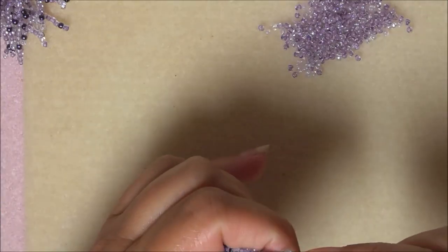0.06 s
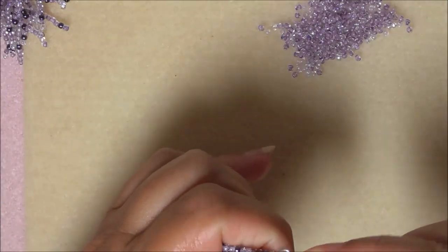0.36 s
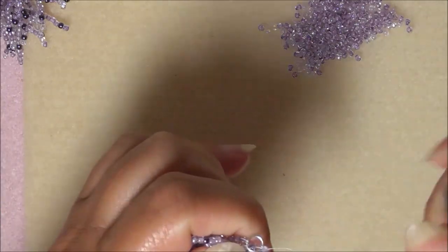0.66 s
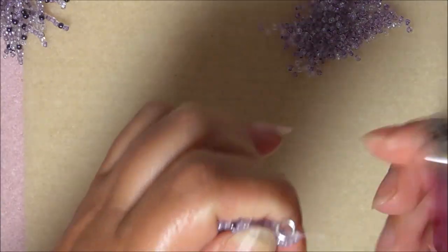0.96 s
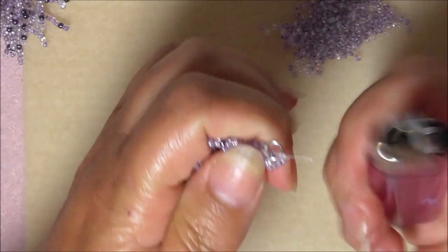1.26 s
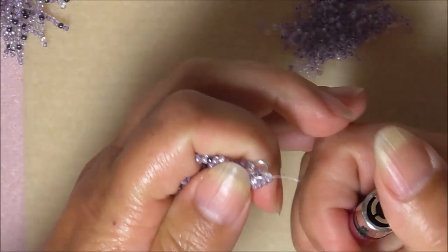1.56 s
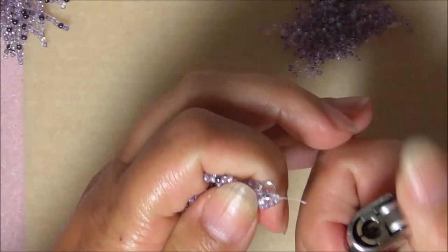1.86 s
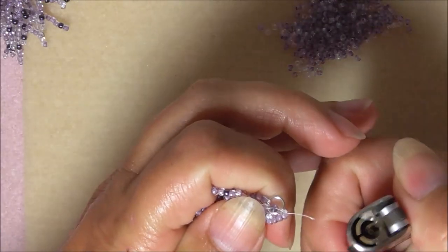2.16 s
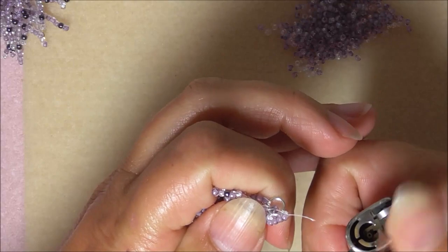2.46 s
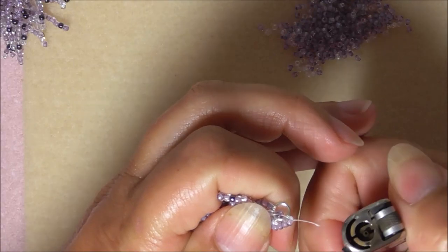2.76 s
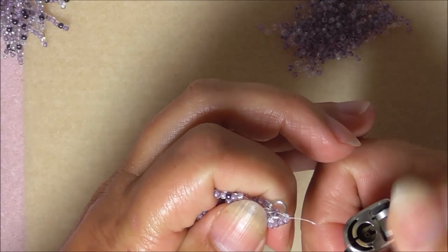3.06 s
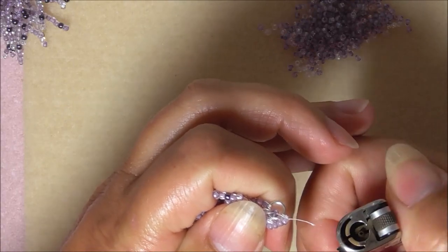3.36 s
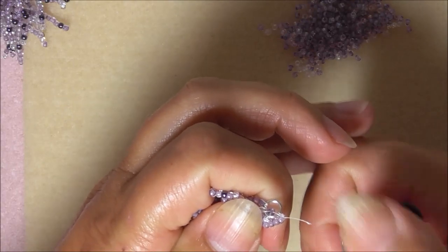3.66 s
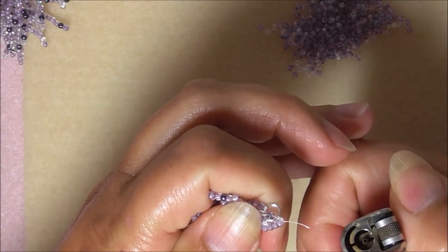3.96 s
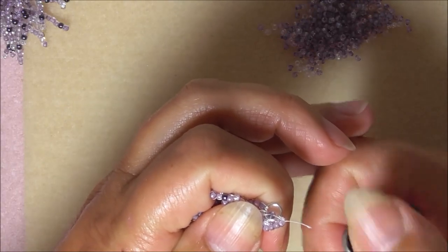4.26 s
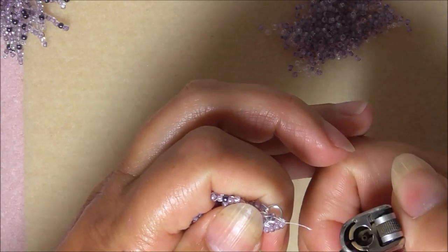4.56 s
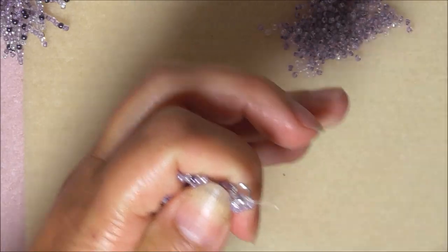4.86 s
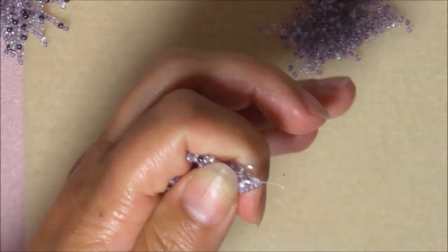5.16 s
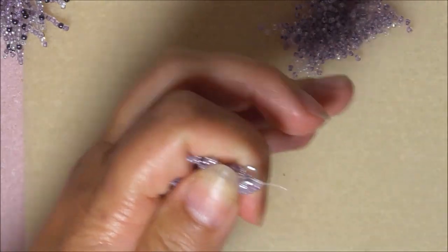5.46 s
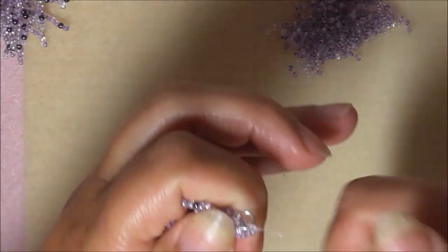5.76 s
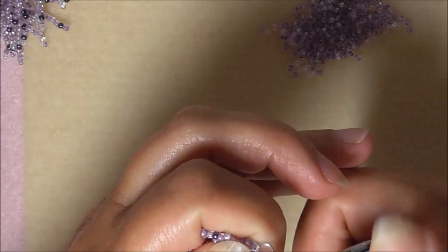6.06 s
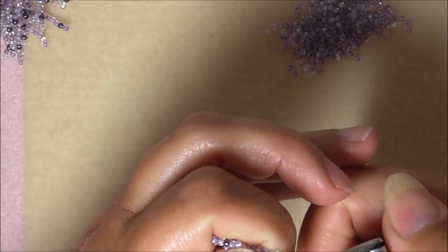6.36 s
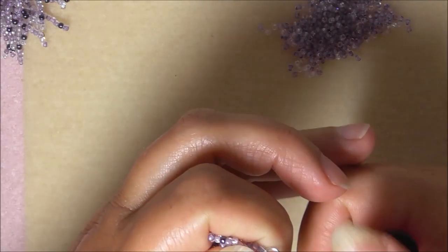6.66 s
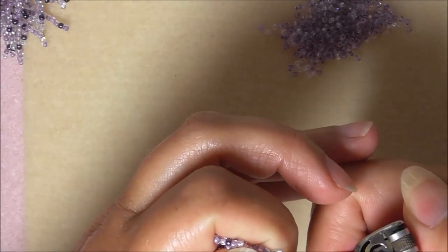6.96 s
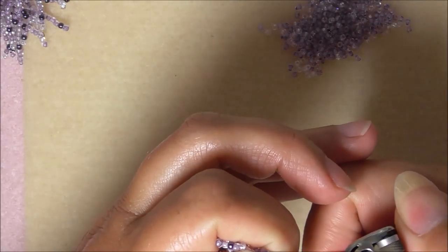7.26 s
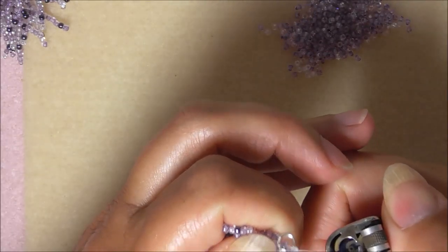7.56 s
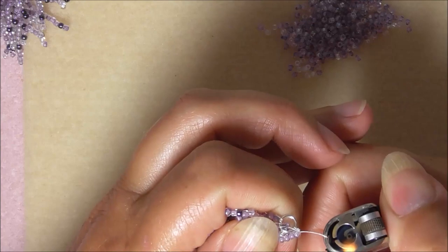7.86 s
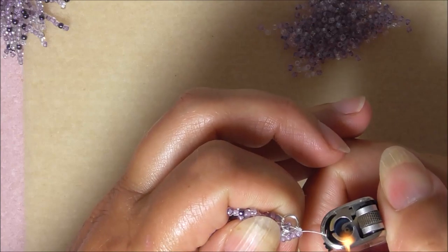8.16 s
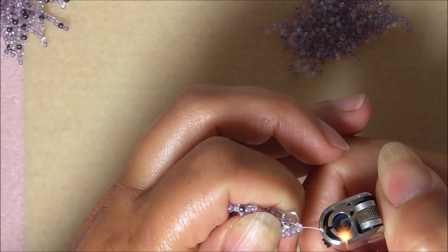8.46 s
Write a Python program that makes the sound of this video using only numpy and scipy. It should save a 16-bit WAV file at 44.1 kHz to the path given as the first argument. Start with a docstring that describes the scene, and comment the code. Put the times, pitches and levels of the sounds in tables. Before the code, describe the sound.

A small quiet room with a low hum and soft hiss is heard throughout. A camera's focus motor purrs faintly at the start and returns in brief spells. From about 1.0 to 1.4 seconds a lighter is picked up close to the microphone, its loose parts ticking and rattling. Its flint wheel is then struck six times, at about 1.8, 2.2, 2.8, 3.3, 3.9 and 4.5 seconds. Each strike is a very short steel rasp ending in a bright, sharp crack, with a soft low thump as the thumb hits the gas lever. The lever shuts with small clicks at 3.7 and 4.9 seconds. Light ticks and soft taps on the desk follow between 5.2 and 6 seconds. Three more strikes come at 5.9, 6.3 and 6.9 seconds. After one tiny tick near 7.4 seconds, only the faint background remains until nearly 9 seconds.

```python
"""Striking a flint lighter

A lighter is picked up, struck nine times over a desk in a small quiet room, and put down, its loose
parts ticking. In each stroke stick-slip friction excites the steel head until the flint sparks with a
crack, and the thumb's impact on the gas lever sets desk and room booming. The stepping focus motor of
a nearby camera purrs faintly over the room's hum and hiss."""
import sys
import numpy as np
from scipy import signal
from scipy.fft import rfft, irfft
from scipy.io import wavfile
from scipy.ndimage import uniform_filter1d

SR = 44100
rng = np.random.default_rng(int(sys.argv[2]) if len(sys.argv) > 2 else 0)


def persist_wave(psi):
    """Save psi, clipped to +-1, as 16-bit WAV."""
    counts = np.round(np.clip(psi, -1, 1) * 32767).astype(np.int16)
    wavfile.write(sys.argv[1], SR, np.atleast_2d(counts).T)


N = 379648

# Levels are relative: each source applies its own gain.
# spectral densities of room air and microphone hiss: f/Hz, level/dB
AIR_SPECTRUM = [(15, -39.5), (25, -11.5), (54, -4.5), (75, -16.5), (119, -3), (485, -10), (629, -11.5),
                (832, -10.5), (1120, -14.5), (1520, -18), (1820, -26), (2310, -20), (3000, -36.5),
                (3900, -66), (6600, -120)]
HISS_SPECTRUM = [(1500, -20), (3000, -1.5), (4300, 1), (5900, -4.5), (6600, -1.5), (7500, 3.5), (8600, 2.5),
                 (11200, 3), (14000, 1.5), (15500, -10)]
AIR_RESONANCES = [(48, 12, 4), (848, 71, 6.5), (1560, 130, 9.5)]  # peaks in the air noise: f/Hz, width/Hz, level/dB
AIR_COHERENCE = [(50, .8), (180, 0.29), (550, -0.22), (1650, .15), (3000, .15)]  # likeness of the air noise left and right: f/Hz, correlation
# swells of rumble and hum: start t/s, end t/s, level/dB above rest
RUMBLE_SWELLS = [(1.0, 2.55, 7), (4.4, 6.2, 8.5)]
HUM_SWELLS = [(4.55, 5.36, 14), (7.56, 8.04, 15)]
FOCUS_RUNS = [(.007, .68, -58.5), (1.129, 1.28, -59.5), (2.49, 2.52, -57.5), (3.407, 3.46, -59.5),
              (3.729, 3.8, -59), (5.362, 5.5, -63.5), (5.604, 5.659, -60), (5.741, 6.06, -62.5),
              (7.646, 7.82, -59.5)]  # the motor turns: start t/s, end t/s, level/dB
# modes of lens barrel, metal hood, desk with room, and gas lever: f/Hz, level/dB, T60/s
LENS_MODES = [(1363, -6.5, 0.051), (1575, -1, .04), (2133, -8, 0.047), (2374, -1, 0.029),
              (3240, -11.5, 0.015), (4780, -3, 0.011)]
HOOD_MODES = [(7520, -8, 0.18), (5460, -24.5, 0.099782), (3706, -26.5, .08)]
BOOM_MODES = [(104.33, -58.5, 0.35), (137.4, -50.5, 0.21), (166, -53, .15), (190.6, -51.5, .35),
              (248, -60, 0.17)]
LEVER_MODES = [(3165, -4, .04), (5420, -1.5, .05), (7540, -4, .15)]
# knocks in the hand: t/s, level/dB, hood level/dB relative to the knock, rattle decay/s
HANDLING_KNOCKS = [(0.9515, -56, 7, .0023), (.977, -53, -6, 0.0045), (1.066, -48, -6, 0.0018),
                   (1.093, -47.5, -14, 0.003748), (1.119, -53.5, -3, .0024), (1.299, -51.5, -10, 0.0079),
                   (1.3163, -39.5, -9, 0.0057), (1.3801, -34.5, -19.5, 0.0036), (1.397, -45, -19, 0.0019),
                   (1.408, -52, 0, 0.005185), (5.163, -56, -24.5, .0015), (5.2529, -44, -30, .0015),
                   (5.264, -48.5, -25, 0.0032), (5.301, -58.5, -30, 0.004), (5.413, -55.5, -18.5, 0.0022),
                   (5.5066, -46, -28, 0.0025), (5.5641, -39.5, -1, 0.0021), (7.362, -56.5, -29, 0.0009047)]
# responses of the steel head (wheel, flint, hood) and the plastic body: f/Hz, level/dB
HEAD_SPECTRUM = [(60, -23.5), (200, -15.5), (700, -23), (1100, -19), (1800, -23), (2800, -22), (3600, -9.5),
                 (4600, -11), (5300, -14), (6100, -12), (7200, -5), (10000, -6), (12500, -5), (15500, -15)]
BODY_SPECTRUM = [(40, -23), (120, 3.5), (280, 1.5), (420, -4.5), (560, -1.5), (750, -11.5), (1050, -3.5),
                 (1500, -16.5), (3000, -17), (8000, -35)]
# head resonances with parts loose, wheel dragging, wheel free, lever shutting: f/Hz, width/Hz, level/dB
LOOSE_PEAKS = [(3150, 250, 5), (4040, 280, 4), (5450, 230, 8), (7600, 350, 4), (8923, 600, 5.5)]
DRAG_PEAKS = [(4490, 210, 7.5), (5283.7, 700, -2.5), (7370, 450, 5), (10100, 400, 1), (11300, 700, 3.5)]
FREE_PEAKS = [(3688.4, 300, 1), (4260, 110, 2), (8030, 640, 7), (8540, 1500, 2.5), (11200, 800, 7.5)]
SNAP_PEAKS = [(8200, 1300, 12), (3500, 500, 2)]
# strokes of the wheel: spark t/s, duration/s, early rasp level/dB, late rasp level/dB, spark level/dB,
# treble tilt/(dB/octave), lead of the wheel's catch over the spark/s, catch level/dB
STROKES = [(1.7787, 0.044, -55, -31, -28.5, .9, 0.04243, -64),
           (2.1848, .053, -54, -32.5, -22, 1, 0.059, -50),
           (2.7634, 0.058, -55, -30.5, -23, -0.5, 0.11, -52.5),
           (3.3318, .045, -54.5, -31.5, -22.5, -0.5, .0719, -53),
           (3.89, .059, -53, -29, -23.5, -0.4, .0722, -48),
           (4.4827, 0.06458, -59.5, -29.5, -26, -0.5, 0.09, -48),
           (5.9154, .045, -55, -32, -29, 1.5, 0.037, -60.5),
           (6.3462, .064, -59.5, -32.5, -26, -0.5, .0759, -62),
           (6.8787, 0.056, -57, -30.5, -22.5, 0, 0.088, -52)]
# the thumb lands on the lever: t/s, knock level/dB, thump level/dB, knock tilt/(dB/octave)
THUMB_LANDINGS = [(1.777, -9.5, -9.5, 0), (1.805, -4, -6, -2.5), (2.1838, 0, -2.5, 0),
                  (2.7647, -1, 0.5, -0.5), (3.3321, -2, -4, -0.5), (3.8899, -1.5, 0, .5),
                  (4.484, -2, 1, -1.5), (5.915, -8.5, -3, 0), (6.3471, -4.5, -2, -1.5),
                  (6.8779, 0.5, -3, 0)]
LEVER_SNAPS = [(3.6918, -42.5), (4.8795, -42)]  # the gas lever shuts: t/s, level/dB
DESK_TAPS = [(4.859, -59, 847), (5.19, -51.5, 1040), (5.367, -59, 1000), (5.931, -54.5, 520),
             (5.988, -57.5, 470)]  # fingers and lighter touch the desk: t/s, level/dB, f/Hz
REVERB_TIMES = [(100, 0.2), (500, 0.1), (2000, .3), (5000, .33), (9000, 0.27), (15000, 0.2)]  # decay of the room: f/Hz, T60/s
NEAR_ECHOES = [(.0012, 0.25), (.0027, .16), (.0046, 0.12), (.0078, .09), (.0097, .09), (.0125, .06),
               (.017, .045)]  # reflections from hands and desk: delay/s, gain
STEREO_LEVEL = [(100, 2), (600, -3), (1500, 0), (4500, -0.5), (7800, 1.5), (9100, 5), (10500, 0),
                (12300, -4.5), (15000, -3.5)]  # excess of left over right: f/Hz, level/dB
STEREO_PHASE = [(0, 0), (3620, 0.1), (4220, 0.29), (7670, 0.1), (8180, 0.5), (8530, -0.1), (11200, -0.044),
                (14100, 0.36), (16100, 0.1)]  # lead of left over right: f/Hz, phase/rad

BODY_HZ, SCENE_HZ = np.fft.rfftfreq(2048, 1 / SR), np.fft.rfftfreq(N, 1 / SR)


def gain_of(db):
    """Amplitude ratio of a level in decibels."""
    return 10 ** (np.asarray(db) / 20)


def unit_rms(x):
    """Normalisation to unit mean power."""
    return x / np.sqrt(np.mean(x ** 2) + 1e-20)


def curve(points, hz):
    """Linear interpolation on a logarithmic frequency axis."""
    f, value = np.transpose(points)
    return np.interp(np.log(hz + 1), np.log(f + 1), value)


def resonances(peaks, hz):
    """Resonance peaks as Lorentzian humps in decibels."""
    return sum(db / (1 + (2 * (hz - f) / width) ** 2) for f, width, db in peaks)


def add(mix, s, sound):
    """Superposition of a sound on the mix at time s."""
    part = mix[..., max(round(s * SR), 0):][..., :sound.shape[-1]]
    part += sound[..., :part.shape[-1]]


def butterworth(x, hz, kind, order=2):
    """Maximally flat high-pass or low-pass filtering."""
    return signal.sosfilt(signal.butter(order, hz, kind, fs=SR, output="sos"), x)


def impulse_response(db):
    """Minimum-phase response of unit energy, found by folding the cepstrum of a spectrum."""
    cepstrum = irfft(np.log(gain_of(db)))
    half = len(db) - 1
    cepstrum[1:half] *= 2
    cepstrum[half + 1:] = 0
    response = irfft(np.exp(rfft(cepstrum)))
    return response / np.linalg.norm(response)


def ring(modes, t):
    """Free vibration as a sum of exponentially damped modes."""
    return sum(gain_of(db - 60 * t / t60) * np.sin(2 * np.pi * hz * t) for hz, db, t60 in modes)


def swells(spans, rest_db, fade_s):
    """Slow amplitude modulation: the level ramps up from rest for each span."""
    t = np.arange(N) / SR
    rise_db = sum(db * np.clip(.5 + np.minimum(t - start, end - t) / fade_s, 0, 1)
                  for start, end, db in spans)
    return gain_of(rest_db + rise_db)


def stereo_noise(db, coherence):
    """Partial coherence: two channels share a part of their coloured noise."""
    left, independent = rfft(rng.standard_normal((2, N)))
    right = coherence * left + np.sqrt(1 - coherence ** 2) * independent
    return unit_rms(irfft(np.array([left, right]) * gain_of(db), N))


def background(air_db=-68, hiss_db=-76, hum_hz=124, waver_hz=3):
    """Noise floor: stationary air and hiss, a swelling rumble and a frequency-modulated hum."""
    air_colour = curve(AIR_SPECTRUM, SCENE_HZ) + resonances(AIR_RESONANCES, SCENE_HZ)
    air = stereo_noise(air_colour, curve(AIR_COHERENCE, SCENE_HZ)) * gain_of(air_db)
    hiss = stereo_noise(curve(HISS_SPECTRUM, SCENE_HZ), coherence=.35) * gain_of(hiss_db)
    low_colour = curve([(50, -26), (115, -4), (220, -1), (400, -14), (1200, -20), (3000, -58.5)], SCENE_HZ)
    rumble = stereo_noise(low_colour, coherence=.33) * swells(RUMBLE_SWELLS, rest_db=-77.5, fade_s=.3)
    drift = unit_rms(uniform_filter1d(rng.standard_normal(N), size=3000))
    hum = np.sqrt(2) * np.sin(2 * np.pi * np.cumsum(hum_hz + waver_hz * drift) / SR)
    return air + hiss + rumble + hum * swells(HUM_SWELLS, rest_db=-84, fade_s=.1)


def focus_motor(level_db=-1.5, step_hz=50, top_hz=4500):
    """Periodic impacts: each motor step rings the lens barrel, every second one more weakly."""
    out, t = np.zeros(N), np.arange(SR // 20) / SR
    attack = 1 - np.exp(-t / .0012)
    for start, end, db in FOCUS_RUNS:
        for k, s in enumerate(np.arange(start, end, 1 / step_hz)):
            modes = [(hz * (1 + .016 * rng.standard_normal()), level, t60) for hz, level, t60 in LENS_MODES]
            whirr = .87 * rng.standard_normal(len(t)) * np.exp(-t / .0081)
            add(out, s, gain_of(db + level_db - 1.3 * (k % 2)) * (ring(modes, t) + whirr) * attack)
    return butterworth(out, top_hz, "low")


def friction(t, teeth_hz, rough_db, rays=1):
    """Stick-slip noise, modulated as teeth catch and slip; one row per direction of radiation."""
    teeth_passed = np.cumsum(teeth_hz * np.ones(len(t))) / SR
    bite = rng.standard_normal(len(t))
    bite_db = rough_db * np.interp(teeth_passed, np.arange(len(t)), bite)
    return unit_rms(rng.standard_normal((rays, len(t))) * gain_of(bite_db))


def steel_head(peaks, tilt_db, detune=.012, ripple_db=2.5):
    """A loaded resonator: each grip shifts the main resonances and damps the small ones differently."""
    shift = 1 + detune * rng.standard_normal()
    octaves = np.clip(np.log2((BODY_HZ + 1) / 9000), -2, 1)
    ripple = uniform_filter1d(rng.standard_normal(len(BODY_HZ)), size=7)
    ripple = unit_rms(uniform_filter1d(ripple, size=5))
    colour = curve(HEAD_SPECTRUM, BODY_HZ) + resonances(peaks, BODY_HZ * shift)
    return impulse_response(colour + tilt_db * octaves + ripple_db * ripple)


def room(sound, wet_db, mids_db, stray=.3):
    """Multipath propagation: direct sound, echoes that shift as the hands move, and a diffuse tail."""
    rays, size = np.atleast_2d(sound), SR // 3
    t = np.arange(size) / SR
    diffuse = rng.standard_normal((len(rays), 2, size)) * np.clip((t - .003) / .0063, 0, 1)
    hz, age, spectra = signal.stft(diffuse, SR, nperseg=256)
    early = 1 + 1.5 * np.exp(-age / .013)  # the nearest walls answer first
    colour_db = mids_db * np.exp(-age / .059) / (1 + (hz[:, None] / 6000) ** 4)
    decay_db = 60 * age / curve(REVERB_TIMES, hz)[:, None]
    tail = signal.istft(spectra * early * gain_of(colour_db - decay_db), SR, nperseg=256)[1][..., :size]
    response = gain_of(wet_db) * tail / np.linalg.norm(tail[:, 0])
    response[0, :, 0] += 1  # the first ray meets both microphones alike
    response[1:, :, 0] += [stray, -stray]  # the others arrive in antiphase
    for side in response[-1]:
        for delay, gain in NEAR_ECHOES:
            add(side, delay * (1 + .15 * rng.uniform(-1, 1)), np.array([gain]))
    return signal.fftconvolve(rays[:, None], response, axes=2).sum(axis=0)


def regrip_times(quick_s=1, lead_s=.204):
    """Times at which the thumb returns to the wheel between strokes in quick succession."""
    sparks = np.array([row[0] for row in STROKES])
    return sparks[1:][np.diff(sparks) < quick_s] - lead_s


def contacts(hood_db=-15, slide=.59, jiggle_hz=18):
    """Contacts due to backlash: t/s, level/dB, hood level/dB, decay/s, rise over decay, resonances."""
    rows = [(*knock, slide, LOOSE_PEAKS) for knock in HANDLING_KNOCKS]
    rows += [(s, db, hood_db, .0022, .12, SNAP_PEAKS) for s, db in LEVER_SNAPS]
    for s, stroke, early_db, *_, lead, catch_db in STROKES:
        rows.append((s - lead, catch_db, hood_db, .0021, slide, LOOSE_PEAKS))  # the wheel catches
        rows.append((s - stroke, early_db + 1.5, hood_db, .002, slide, DRAG_PEAKS))  # and breaks loose
    rows += [(s, -66.5, hood_db, .015, slide, LOOSE_PEAKS) for s in regrip_times()]
    for s in np.arange(.99, 1.38, 1 / jiggle_hz):  # parts jiggle as the lighter is picked up
        delay, db = rng.random() / jiggle_hz, rng.normal(-62, 2)
        rows.append((s + delay, db, -5, .003, slide, LOOSE_PEAKS))
    return rows


def ticks(rattle_db=2, thin_hz=2100, top_hz=14500):
    """Contact noise: wheel and lever slide and rattle in their play, exciting the hood's modes."""
    out, t = np.zeros((2, N)), np.arange(-SR // 30, SR // 5) / SR
    for s, db, hood_db, decay, slide, peaks in contacts():
        envelope = np.exp(-abs(t) / np.where(t < 0, slide * decay, decay))
        force = friction(t, teeth_hz=1200, rough_db=3)[0] * envelope
        head = steel_head(peaks, tilt_db=-2.5 + .3 * (db + 40), detune=.022)  # softer is duller
        rattle = gain_of(rattle_db) * signal.fftconvolve(force, head)[:len(t)]
        hood = gain_of(hood_db) * ring(HOOD_MODES, np.maximum(t, 0))
        add(out, s + t[0], gain_of(db) * room(rattle + hood, wet_db=-7.5, mids_db=2))
    thin = butterworth(out, thin_hz, "high", order=1)  # small parts radiate little bass
    return butterworth(thin, top_hz, "low", order=1)


def wheel_strokes(rasp_db=-1, spark_db=5, rise_s=.0014, fall_s=.0018):
    """Friction and brittle fracture: the wheel speeds up and bites harder until flint cracks away."""
    out = np.zeros((2, N))
    for s, stroke, early_db, late_db, crest_db, tilt_db, *_ in STROKES:
        t = np.arange(-stroke - .04, .012, 1 / SR)
        creep = [(t[0], early_db - 24), (-stroke, early_db - 14)]
        drive = [(-stroke + .002, early_db - 4.5), (-.029, (early_db + late_db) / 2 - 3), (-.007, late_db)]
        release = [(0, late_db), (.004, late_db - 13.5), (.012, late_db - 38.5)]
        drag_db = np.interp(t, *np.transpose(creep + drive + release))
        teeth_hz = np.interp(t, [-stroke, 0], [350, 1200])
        drag = friction(t, teeth_hz, rough_db=3.5, rays=3) * gain_of(drag_db + rasp_db)
        burst = gain_of(crest_db + spark_db) * np.exp(-abs(t) / np.where(t < 0, rise_s, fall_s))
        fracture = friction(t, teeth_hz=2500, rough_db=.93, rays=3) * burst
        rasp = signal.fftconvolve(drag, steel_head(DRAG_PEAKS, tilt_db)[None])
        crack = signal.fftconvolve(fracture, steel_head(FREE_PEAKS, tilt_db)[None])
        add(out, s + t[0], room(rasp + crack, wet_db=-9, mids_db=13, stray=.2))
    return out


def thumb_landings(knock_db=-18, thump_db=1, swell_s=.004, contact_s=.002, scuff=.06):
    """Impact excitation: the thumb knocks and scuffs the plastic lever, jolting desk and room modes."""
    out, t = np.zeros((2, N)), np.arange(SR // 2) / SR
    octaves, brief = np.log2(BODY_HZ + 20), t[:1024]
    for s, hit_db, low_db, tilt_db in THUMB_LANDINGS:
        body = impulse_response(curve(BODY_SPECTRUM, BODY_HZ) + tilt_db * octaves)
        force = scuff * friction(brief, teeth_hz=1000, rough_db=-.35, rays=3) * np.exp(-brief / contact_s)
        force[0, 0] += 1  # the blow itself
        knock = signal.fftconvolve(force, body[None])
        add(out, s, gain_of(hit_db + knock_db) * room(knock, wet_db=0, mids_db=2, stray=.8))
        modes = [(hz, db + rng.standard_normal(), t60) for hz, db, t60 in BOOM_MODES]
        add(out, s, gain_of(low_db + thump_db) * ring(modes, t) * (1 - np.exp(-t / swell_s)))
    return butterworth(out, 65, "high")


def lever_pings(level_db=-71, scatter_db=5, delay_s=.02):
    """Free vibration: the released lever springs up and rings, each time in a new blend of modes."""
    out, t = np.zeros((2, N)), np.arange(SR // 5) / SR
    for s in regrip_times():
        modes = [(hz, db + scatter_db * rng.standard_normal(), t60) for hz, db, t60 in LEVER_MODES]
        add(out, s + delay_s, gain_of(level_db) * room(ring(modes, t), wet_db=-12, mids_db=1))
    return out


def desk_taps(contact_s=.0055):
    """Damped impacts: each padded bump on the desk excites one broad resonance."""
    out, t = np.zeros((2, N)), np.arange(SR // 20) / SR
    for s, db, pitch_hz in DESK_TAPS:
        octaves = np.log2((BODY_HZ + 20) / pitch_hz)
        body = impulse_response(-20 * np.log10(1 + 2 * octaves ** 2))
        force = rng.standard_normal(len(t)) * np.exp(-t / contact_s)
        add(out, s, gain_of(db) * room(signal.fftconvolve(force, body), wet_db=-3.5, mids_db=-8.5))
    return out


def scene():
    """Superposition; the lighter reaches two microphones with level and phase that vary by frequency."""
    lighter = wheel_strokes() + thumb_landings() + ticks() + lever_pings() + desk_taps()
    left = gain_of(curve(STEREO_LEVEL, SCENE_HZ) / 2) * np.exp(1j * curve(STEREO_PHASE, SCENE_HZ) / 2)
    placed = irfft(rfft(lighter) * np.array([left, 1 / left]), N)
    return placed + focus_motor() + background()


def record(dry):
    """Band limiting: a bass cut at 36 Hz and a linear-phase low-pass at 15850 Hz."""
    low_pass = signal.firwin(255, 15850, window=("kaiser", 8), fs=SR)
    return signal.oaconvolve(butterworth(dry, 36, "high", order=4), low_pass[None], "same")


dry = scene()
out = record(dry)
persist_wave(out)
```